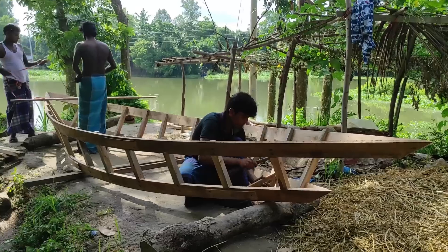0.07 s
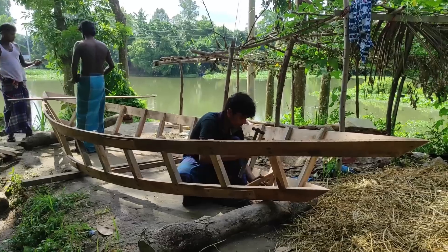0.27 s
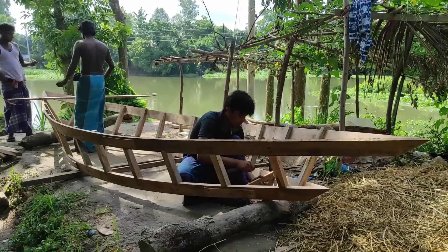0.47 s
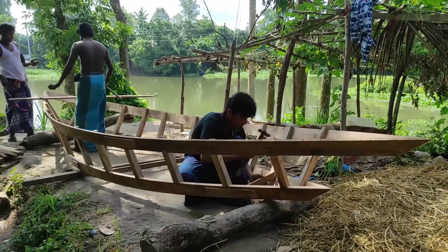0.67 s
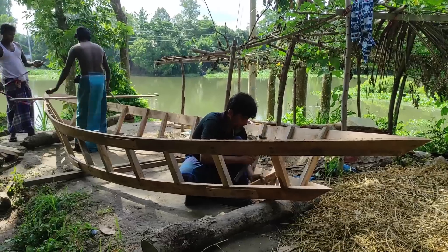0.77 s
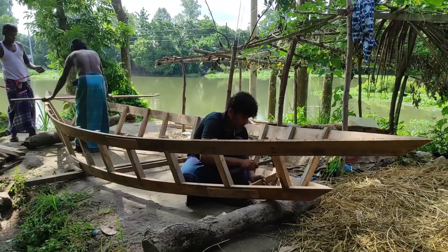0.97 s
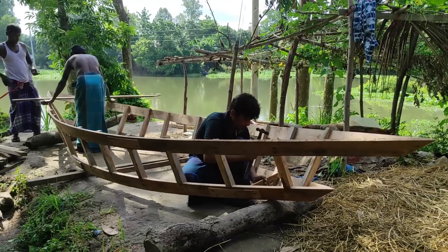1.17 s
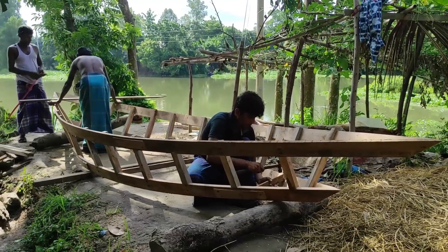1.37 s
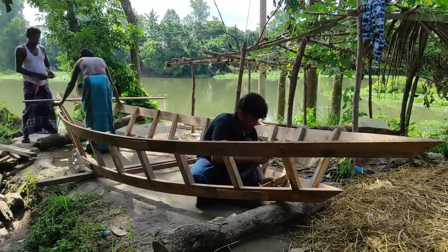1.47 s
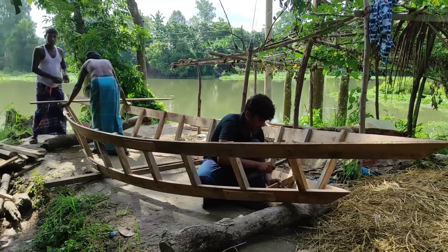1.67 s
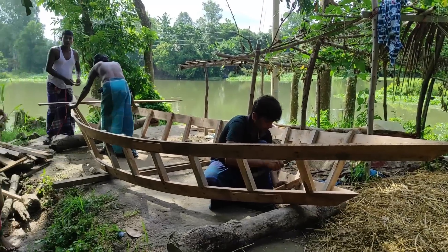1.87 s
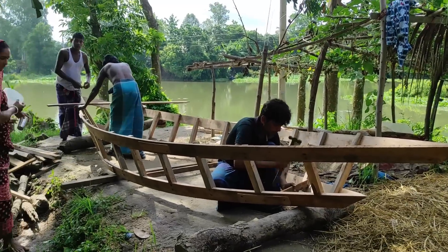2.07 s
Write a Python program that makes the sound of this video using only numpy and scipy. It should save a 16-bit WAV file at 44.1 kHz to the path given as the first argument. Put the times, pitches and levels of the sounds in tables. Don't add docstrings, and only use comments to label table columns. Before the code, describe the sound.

Steel hammer driving a nail into boat ribs, five loud even knocks over quiet birds and insects

```python
import sys
import numpy as np
from scipy import signal
from scipy.fft import rfft, irfft
from scipy.io import wavfile
from scipy.ndimage import uniform_filter1d, map_coordinates

SR = 44100
rng = np.random.default_rng(int(sys.argv[2]) if len(sys.argv) > 2 else 0)


def voltage_ratio(decibels):
    exponent = np.asarray(decibels, float) / 20
    return 10 ** exponent


def persist_wave(psi):
    counts = np.round(np.clip(psi, -1, 1) * 32767).astype(np.int16)
    wavfile.write(sys.argv[1], SR, np.atleast_2d(counts).T)


N = 93933

# (time [s], peak [dB], rib resonance [dB], brightness [dB/octave], crack hold [s])
BLOWS = [
    (0.2959, -1, 1.5, -1, .0022),
    (0.7656, -1.5, 0, -1, 0.0023),
    (1.1898, 2.5, -2, -0.1, 0.0027),
    (1.6207, 5, -1, -0.86, 0.0063),
    (2.0677, 2.5, .5, 1, 0.0038),
]
# (time [s], peak [dB])
REBOUNDS = [
    (.3046, -17),
    (.8050, -9),
    (1.2294, -10),
    (1.6298, -7),
    (2.073, -10),
]
# (frequency [Hz], density [dB/Hz])
KNOCK_SPECTRUM = [(300, -35), (1200, 15), (2400, 0), (4500, -9)]
# (frequency [Hz], density [dB/Hz])
CRACK_SPECTRUM = [(200, -42.5), (400, -25), (1400, 3), (2500, -11), (3500, -1.5), (5000, -1), (8000, -3.5),
                  (16000, -7.5)]
# (frequency [Hz], density [dB/Hz])
TICK_SPECTRUM = [(900, -30), (1500, -10), (3500, -12.5), (5000, -3.5), (6200, -9), (8400, -2.5),
                 (16000, -2.5)]
# (frequency [Hz], density [dB/Hz])
RATTLE_SPECTRUM = [(60, -47), (130, -14), (500, -8), (900, -1), (1500, -8.5), (2300, 2), (4500, -16),
                   (16000, -13.5)]
# (frequency [Hz], t60 [s])
RATTLE_DECAY = [(150, 0.43), (700, 0.14), (2500, 0.12), (8000, 0.24), (14000, 0.063)]
# (frequency [Hz], level [dB], t60 [s])
RIB_MODES = [(149.66, -12, 0.37), (168.5, -7.5, 0.43), (196.5, -3.5, 0.25), (240.5, 1.5, 0.14),
             (308.4, -2.5, .15), (466, -15.5, 0.29), (644, 2, 0.084), (816.4, 2, 0.061), (889, 1.5, 0.086),
             (1160, -8.5, 0.054), (1624, -8, 0.053), (2103, 0.5, .06), (2545, -1, 0.038)]
# (frequency [Hz], level [dB], t60 [s])
NAIL_MODES = [(1117, -3.5, 0.028), (1507, 0.5, .02), (2112, -10.5, 0.024), (2560, -1.5, 0.032),
              (3400, -15, 0.004), (4730, -4.5, 0.0074), (7550, -3, 0.014), (8340, -14, 0.015)]
# (frequency [Hz], t60 [s])
TREE_DECAY = [(150, 0.63), (700, 0.22), (2500, 0.42), (8000, 0.4), (14000, 0.31)]
# (time [s], pitch [Hz], level [dB])
WHISTLE_PATH = [(.18, 4700, -64), (.21, 4690, -53), (.23, 4670, -60), (.28, 4630, -49), (.39, 4580, -44),
                (.45, 4530, -52), (.6, 4370, -43), (.67, 4290, -51), (.77, 4120, -39)]
WHISTLE_OVERTONES = [-22, -22]
# (start [s], length [s], first pitch [Hz], last pitch [Hz], level [dB])
WARBLE_NOTES = [(.0, 0.019, 3800, 3830, -49), (0.044, 0.047, 4330, 4510, -48.5),
                (0.076, 0.047, 3900, 3680, -45), (0.1, 0.051, 3426, 2574, -48),
                (0.229, 0.039, 3700, 3440, -53.5), (0.423, 0.065, 3100, 2783, -49),
                (0.479, 0.051, 3400, 3190, -47.5), (0.512, 0.044, 3200, 2280, -47.5),
                (0.912, 0.043, 4770, 4350, -51.5), (0.946, 0.056, 2810, 3070, -52.5),
                (0.997, .06, 3960, 4000, -69.5), (1.36, 0.064, 3550, 3545, -60.5),
                (1.47, 0.036, 3480, 4000, -78), (1.95, 0.018, 1840, 1760, -60.5)]
# (start [s], length [s], pitch [Hz], level [dB])
FAR_COO = (.095, .1, 980, -57)
# (start [s], length [s], level [dB])
CRICKET_BURSTS = [
    (0.605, 0.16, -51),
    (0.981, 0.33, -57),
    (1.348, .14, -54.5),
]
# (time [s], level [dB])
GROVE_LEVEL = [(0.0, -46), (0.15, -51.5), (0.34, -56), (0.47, -43.5), (0.78, -51.5), (1.01, -46.5),
               (1.66, -55), (1.8, -73), (2.13, -37)]
# (frequency [Hz], density [dB/Hz])
GROVE_SPECTRUM = [(1200, -32.5), (1900, -11.5), (2600, -8.5), (3600, -4), (4600, -9), (5800, -13.5),
                  (8000, -14.5), (11400, -2), (11900, -40)]
# (time [s], level [dB])
BREEZE_LEVEL = [(0, -48.5), (.25, -48.5), (.7, -52.5), (1.1, -52.5), (1.5, -51), (1.9, -54), (2.13, -54)]
# (frequency [Hz], density [dB/Hz])
BREEZE_SPECTRUM = [(20, 1), (100, -9), (250, -8), (500, -16.5), (1500, -18.5), (4000, -31), (8000, -29),
                   (11400, -5.5), (11900, -65.5)]
# (frequency [Hz], gain [dB])
MIC_RESPONSE = [(4000, 1), (5900, -0.5), (7000, 3.5), (8300, 9.5), (9300, -2), (10000, -10.5), (12000, -21),
                (16000, -22)]

LEAD_S, LEAD_DB = .004, -30
CRACK_DB, CRACK_T60_S, TICK_HOLD_S = -8, .008, .0022
RIBS_DB, RIB_RISE_CYCLES = -21.5, 1.96
NAIL_DB, NAIL_RISE_CYCLES = -8, 2.1
RATTLE_DB, RATTLE_GRAIN_DB, RATTLE_RISE_S = -10, 2.5, .0015
THUMP_HZ, THUMP_DB = 35, -57.5
TREES_DB, TREES_DELAY_S = -16, 0.013
WHISTLE_FLUTTER_DB, WHISTLE_TRIM_DB = 3.5, -3
TRILL_HZ, TRILL_DEPTH, TRILL_JITTER = 55, .1, .018
TRILLS_END_S = .99
WARBLE_FLUTTER_DB, WARBLE_OVERTONE_DB = 3, -13.5
WARBLE_ECHO_DB, WARBLE_ECHO_T60_S = 0, .3
CRICKET_HZ, CRICKET_WIDTH_HZ = 8900, 170
CLIP_TOP, CLIP_HARD = 1.05, 8


def unit(x):
    return x / np.sqrt(np.mean(x ** 2) + 1e-20)


def along(points, hz):
    f, v = np.transpose(points)
    return np.interp(np.log(hz + 1), np.log(f + 1), v)


def curves(rows):
    s, *cols = np.transpose(rows)
    return [np.interp(np.arange(N) / SR, s, c) for c in cols]


def wobble(rate, size):
    knots = rng.standard_normal(int(size * rate / SR) + 4)
    return map_coordinates(knots, [np.arange(size) * rate / SR])


def hiss(spectrum, size, tilt_db=0):
    hz = np.fft.rfftfreq(size, 1 / SR)
    octaves = np.log2(np.maximum(hz / 2000, 1))
    gain = voltage_ratio(along(spectrum, hz) + tilt_db * octaves)
    return unit(irfft(rfft(rng.standard_normal(size)) * gain, size))


def dying(x, decays):
    hz, t, z = signal.stft(x, SR, nperseg=256)
    fade = voltage_ratio(-60 * t / along(decays, hz)[:, None])
    return signal.istft(z * fade, SR, nperseg=256)[1][:len(x)]


def patchy(x, depth_db):
    z = signal.stft(x, nperseg=512)[2]
    field = uniform_filter1d(rng.standard_normal(z.shape), 6, 0)
    field = uniform_filter1d(field, 10, 1)
    return unit(signal.istft(z * voltage_ratio(depth_db * unit(field)), nperseg=512)[1][:N])


def add(track, sound, s):
    track[max(round(s * SR), 0):][:len(sound)] += sound


def scattered(x, decays):
    tail = dying(rng.standard_normal(SR // 2), decays)
    return signal.fftconvolve(x, tail / np.linalg.norm(tail))[:SR // 2]


def hammer():
    out = np.zeros(N + SR)
    hits = []
    for s, db, wood_db, tilt_db, hold_s in BLOWS:
        steel = voltage_ratio(CRACK_DB) * crack(CRACK_SPECTRUM, tilt_db, hold_s)
        hits.append((s, voltage_ratio(db) * (steel + timber(wood_db, tilt_db))))
    for s, db in REBOUNDS:
        hits.append((s, voltage_ratio(db + 2) * crack(TICK_SPECTRUM, 0, TICK_HOLD_S)))
    for s, sound in hits:
        add(out, sound, s)
        add(out, voltage_ratio(TREES_DB) * scattered(sound, TREE_DECAY), s + TREES_DELAY_S)
    for s, db, *_ in BLOWS:
        add(out, voltage_ratio(db + LEAD_DB) * lead_knock(), s - LEAD_S)
        add(out, voltage_ratio(THUMP_DB) * ground_jolt(), s)
    return out[:N]


def crack(spectrum, tilt_db, hold_s):
    t = np.arange(SR // 2) / SR
    return hiss(spectrum, len(t), tilt_db) * voltage_ratio(-60 * np.maximum(t - hold_s, 0) / CRACK_T60_S)


def timber(ribs_db, tilt_db):
    t = np.arange(SR // 2) / SR
    ribs = voltage_ratio(RIBS_DB + ribs_db) * ringing(RIB_MODES, RIB_RISE_CYCLES, .7)
    nail = voltage_ratio(NAIL_DB) * ringing(NAIL_MODES, NAIL_RISE_CYCLES, 1.0)
    rattle = dying(hiss(RATTLE_SPECTRUM, len(t), tilt_db), RATTLE_DECAY)
    rattle = rattle * voltage_ratio(RATTLE_GRAIN_DB * wobble(314, len(t)))
    return ribs + nail + voltage_ratio(RATTLE_DB) * rattle * (1 - np.exp(-t / RATTLE_RISE_S))


def ringing(modes, rise_cycles, waver):
    t = np.arange(SR // 2) / SR
    out = np.zeros(len(t))
    for hz, db, t60 in modes:
        decay = voltage_ratio(db + rng.normal(0, 1.3) - 60 * t / t60)
        rise = 1 - np.exp(-t * hz / rise_cycles)
        detuned_hz = hz * (1 + 0.0064 * rng.normal())
        out += decay * rise * np.sin(2 * np.pi * detuned_hz * t + waver * wobble(40, len(t)))
    return out


def lead_knock():
    rise = np.linspace(0, 1, round(LEAD_S * SR))
    return rise * hiss(KNOCK_SPECTRUM, 1024)[:len(rise)]


def ground_jolt():
    size = round(SR / THUMP_HZ)
    return np.sin(np.linspace(0, 2 * np.pi, size)) * np.hanning(size)


def whistle():
    hz, db = curves(WHISTLE_PATH)
    t = np.arange(N) / SR
    phase = 2 * np.pi * np.cumsum(hz + 14 * wobble(150, N)) / SR
    first_s, last_s = WHISTLE_PATH[0][0], WHISTLE_PATH[-1][0]
    on = np.clip(np.minimum(t - first_s, last_s - t) / .02, 0, 1)
    tone = np.sin(phase)
    for harmonic, overtone_db in enumerate(WHISTLE_OVERTONES, 2):
        tone += voltage_ratio(overtone_db) * np.sin(harmonic * phase)
    level = voltage_ratio(db + WHISTLE_TRIM_DB + WHISTLE_FLUTTER_DB * wobble(98, N))
    return np.sqrt(2) * on * level * tone


def warblers():
    out = np.zeros(N + SR)
    for s, length, first_hz, last_hz, db in WARBLE_NOTES:
        u = np.linspace(0, 1, round(length * SR))
        glide_hz = first_hz + (last_hz - first_hz) * u
        depth = TRILL_DEPTH * (s < TRILLS_END_S)
        trill = depth * np.sin(2 * np.pi * TRILL_HZ * length * u)
        hz = glide_hz * (1 + trill + TRILL_JITTER * wobble(300, len(u)))
        phase = 2 * np.pi * np.cumsum(hz) / SR
        tone = np.sin(phase) + voltage_ratio(WARBLE_OVERTONE_DB) * np.sin(2 * phase)
        level = voltage_ratio(db + 6 + WARBLE_FLUTTER_DB * wobble(150, len(u)))
        note = level * np.sqrt(np.abs(np.sin(np.pi * u))) * tone
        add(out, note, s)
        add(out, voltage_ratio(WARBLE_ECHO_DB) * scattered(note, [(1000, WARBLE_ECHO_T60_S)]), s)
    s, length, hz, db = FAR_COO
    t = np.arange(round(length * SR)) / SR
    swell = np.sqrt(np.sin(np.pi * t / length))
    add(out, voltage_ratio(db + 1.5 * wobble(43, len(t))) * swell * np.sin(2 * np.pi * hz * t), s)
    return out[:N]


def cricket():
    out = np.zeros(N)
    for s, length, db in CRICKET_BURSTS:
        t = np.arange(round(length * SR)) / SR
        shimmer = wobble(2 * CRICKET_WIDTH_HZ, len(t)) * np.sin(2 * np.pi * CRICKET_HZ * t)
        add(out, voltage_ratio(db) * np.sin(np.pi * t / length) * shimmer, s)
    return out


def riverbank():
    (grove_db,), (breeze_db,) = curves(GROVE_LEVEL), curves(BREEZE_LEVEL)
    grove = patchy(hiss(GROVE_SPECTRUM, N + 512), depth_db=1.5)
    breeze = patchy(hiss(BREEZE_SPECTRUM, N + 512), depth_db=3.0)
    return voltage_ratio(grove_db + 1.0 * wobble(5.8, N)) * grove + voltage_ratio(breeze_db) * breeze


def scene():
    return (hammer() + whistle() + warblers() + cricket() + riverbank())[None]


def microphone(sound):
    gain = voltage_ratio(along(MIC_RESPONSE, np.fft.rfftfreq(512, 1 / SR)))
    ceps = irfft(np.log(gain))
    ceps[1:256] *= 2
    ceps[257:] = 0
    impulse = irfft(np.exp(rfft(ceps)))
    heard = signal.fftconvolve(sound, impulse[None], axes=1)[:, :N]
    return heard / (1 + np.abs(heard / CLIP_TOP) ** CLIP_HARD) ** (1 / CLIP_HARD)


def top_cut(x):
    return signal.sosfilt(signal.butter(12, 15800, fs=SR, output="sos"), x)


def record(dry):
    mix = microphone(dry)
    return top_cut(mix)


dry = scene()
out = record(dry)
persist_wave(out)
```